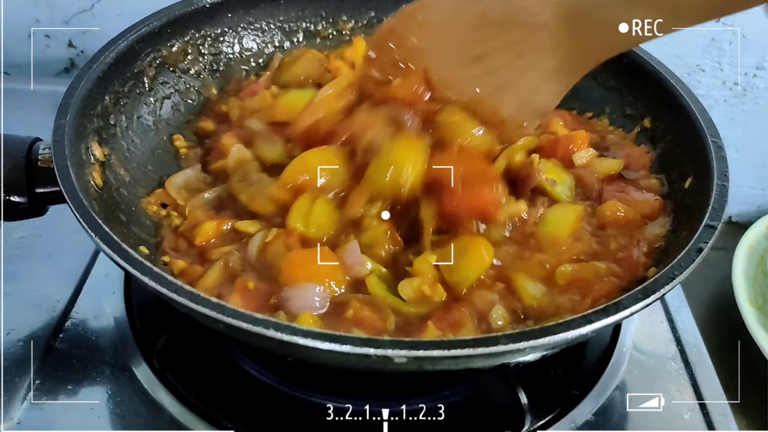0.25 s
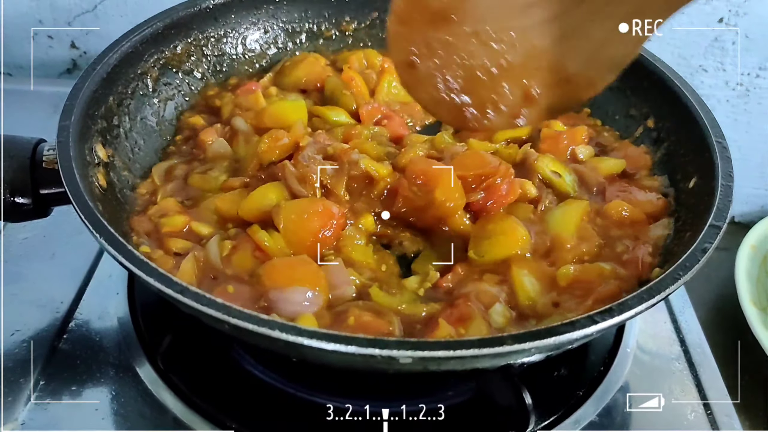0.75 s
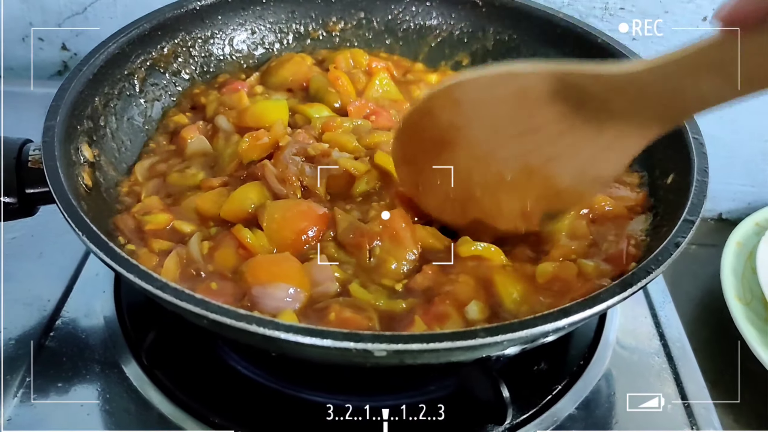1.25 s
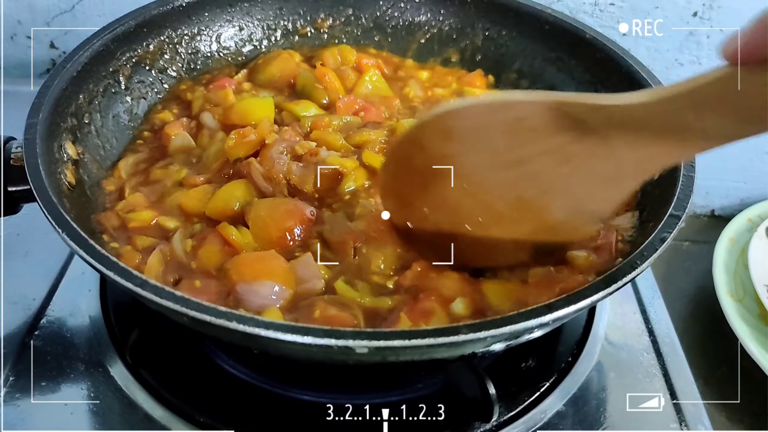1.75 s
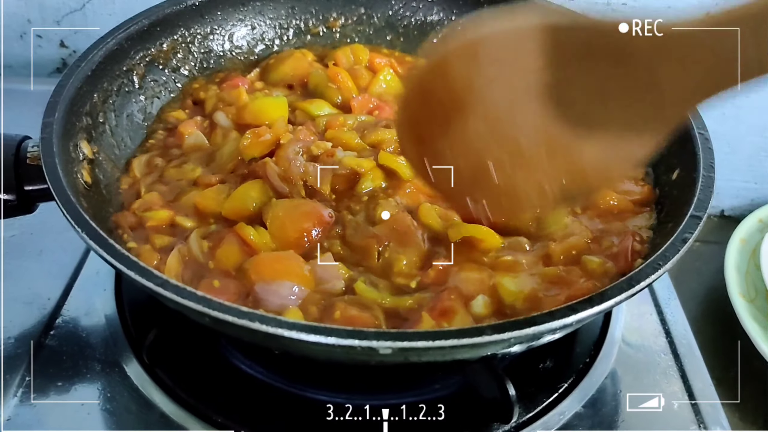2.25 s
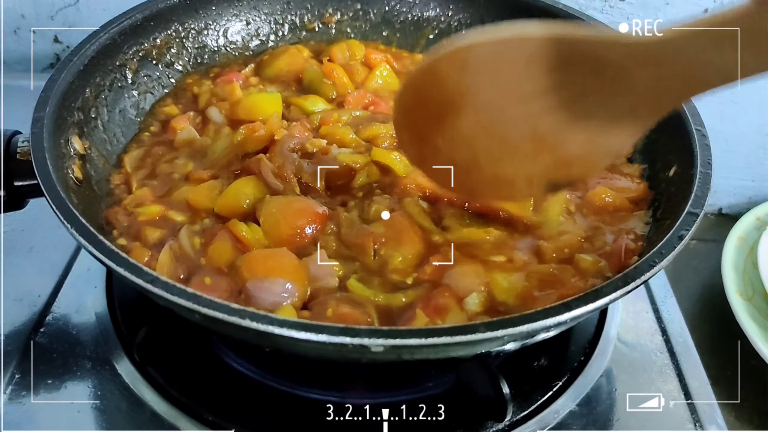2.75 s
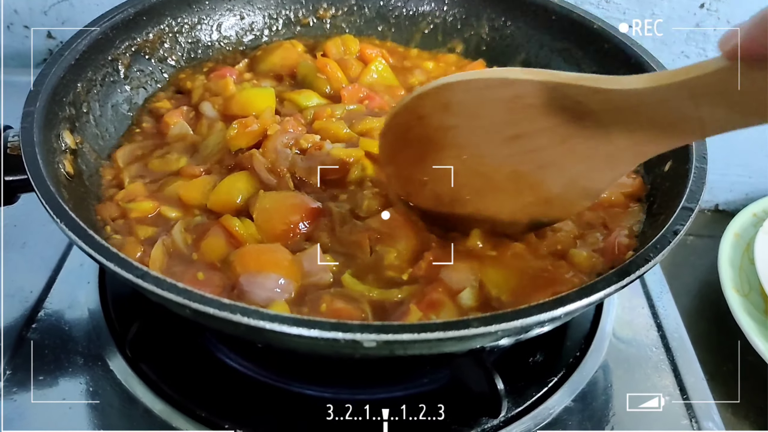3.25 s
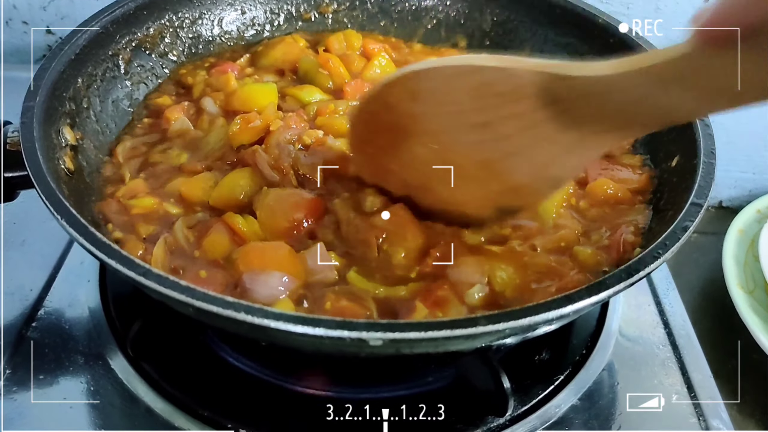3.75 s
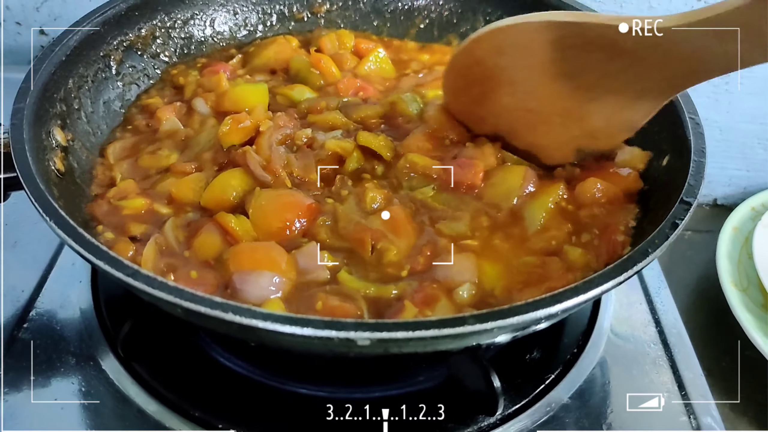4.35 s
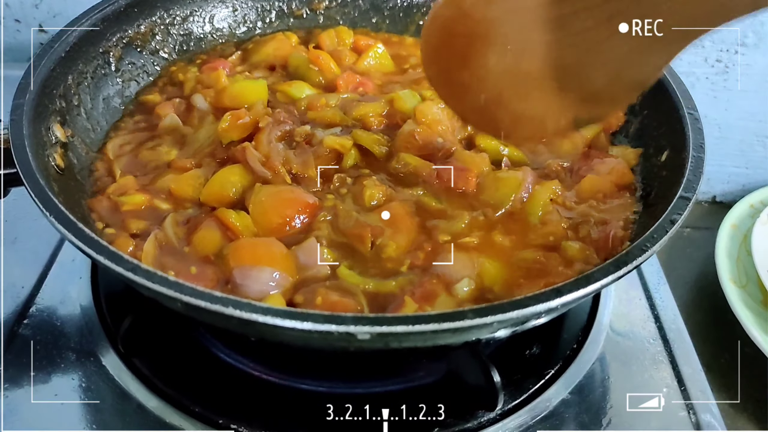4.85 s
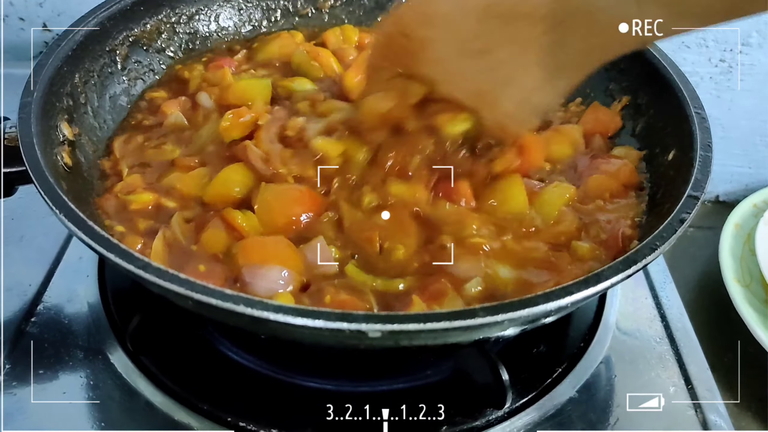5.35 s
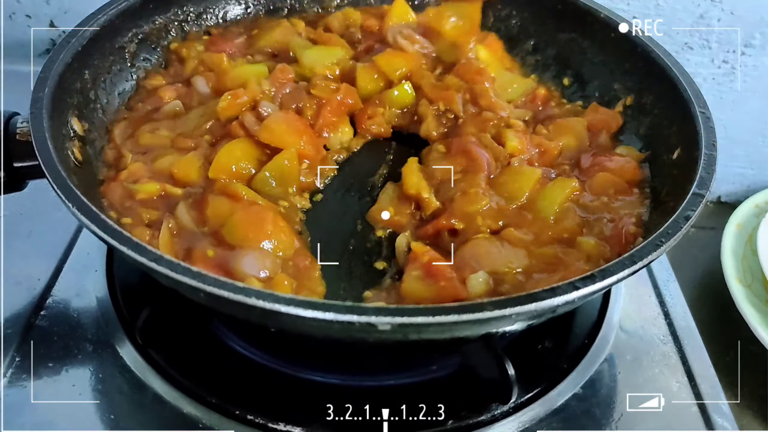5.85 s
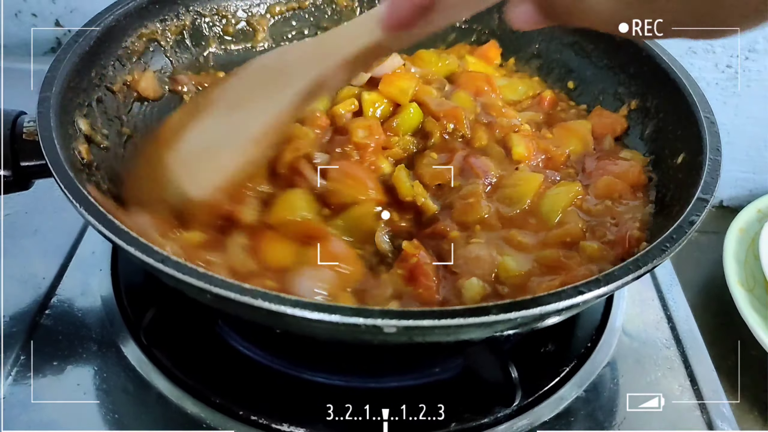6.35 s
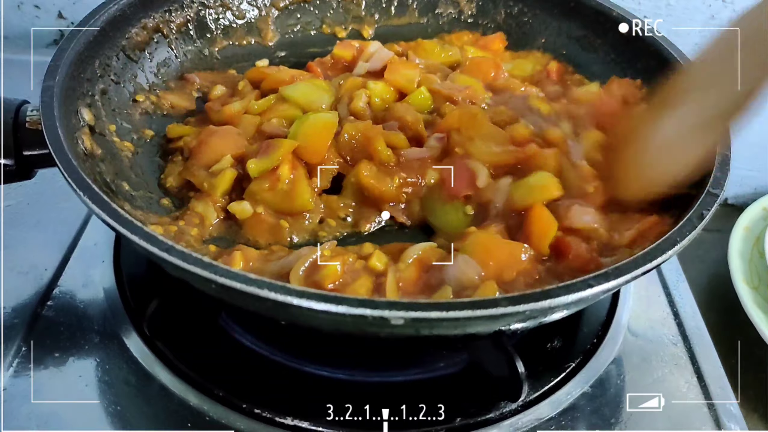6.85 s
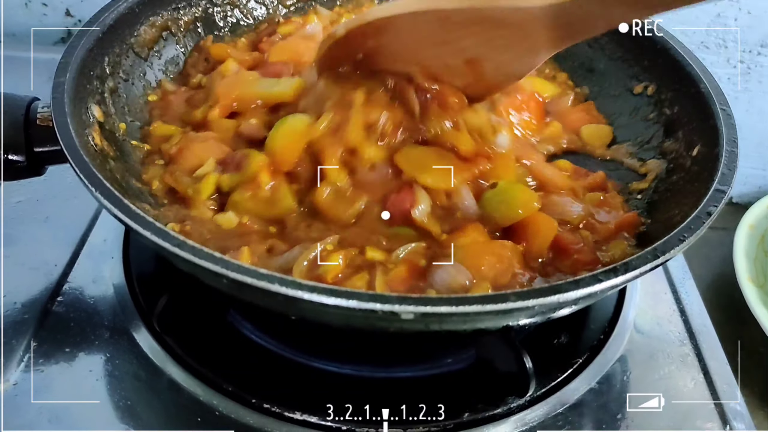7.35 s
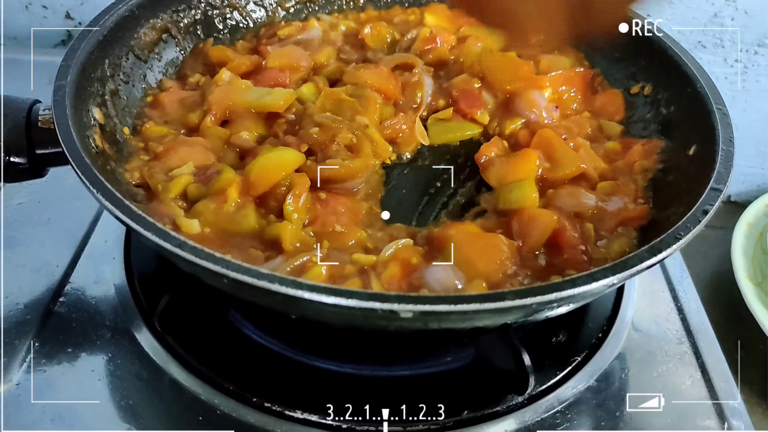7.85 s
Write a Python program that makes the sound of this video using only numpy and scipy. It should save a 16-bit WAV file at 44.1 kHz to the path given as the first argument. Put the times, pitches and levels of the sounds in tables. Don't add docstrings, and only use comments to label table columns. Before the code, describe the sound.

A wooden spoon chops through simmering sauce and hits the pan floor: evenly spaced woody, briefly ringing knocks at first, the strongest early on. Then about a second and a half of only bubbling, sizzle and spits. More knocks follow, softer and uneven, mixed with short gritty drags. Near stereo microphones in a small home kitchen, little bass, brighter on the right, brief room reflections.

```python
import sys
import numpy as np
from scipy import signal
from scipy.fft import rfft, irfft, next_fast_len
from scipy.io import wavfile
from scipy.ndimage import uniform_filter1d

SR = 44100
rng = np.random.default_rng(int(sys.argv[2]) if len(sys.argv) > 2 else 0)


def generate_wav(signal):
    frames = np.transpose(np.atleast_2d(signal))
    scaled = np.clip(frames, -1, 1) * 32767
    pcm = np.round(scaled).astype(np.int16)
    wavfile.write(sys.argv[1], SR, pcm)


def boost(x):
    u = np.asarray(x, float) / 20
    return 10 ** u


N = 357651
T = np.arange(N) / SR
PADDED = next_fast_len(N + SR // 10)
HZ = np.maximum(np.fft.rfftfreq(PADDED, 1 / SR), 1)

# f/Hz, level/dB, t60/s, left over right/dB
PAN = [(306.6, -17, 0.2, 5), (338, -14, 0.36, 1), (380.5, -0.5, 0.2, -2), (412.3, -12.5, 0.17, 12),
       (480.3, -3, 0.2, -4), (543, -8, 0.24, 0.5), (608, -21, 0.18, -16), (659.5, 3.5, 0.047, -2.5),
       (712.4, -11, 0.18, 9), (757, -0.5, 0.067, 10), (873, -9, 0.05, -11), (903.5, -7.5, 0.066, -12),
       (975, -3.5, 0.075, -5), (1055, -7.5, 0.09, -1), (1148, -14, 0.11, -6.5), (1272, -14, 0.043, -8),
       (1400, -13.5, 0.13, 5.5), (1520, -17, 0.097, -9), (1596, -26.5, 0.18, 5), (1712, -16, 0.068, -18),
       (1998, -21.5, 0.087, -4), (2215, -16.5, 0.1, 10.5), (2370, -35, 0.06, -9), (2683, -17, .06, -8),
       (3020, -30.5, 0.065, -25), (3380, -41, 0.055, -1)]


def rms_one(x):
    return x / np.sqrt(np.mean(x ** 2) + 1e-20)


def columns(rows, at, scale=np.asarray):
    first, *rest = np.transpose(rows)
    return np.array([np.interp(scale(at), scale(first), column) for column in rest])


def bandpass(order, band_hz):
    return signal.butter(order, band_hz, "band", fs=SR, output="sos")


def drift(rate_hz):
    r = np.exp(-80 * np.pi * rate_hz / SR)
    noise = rng.standard_normal(N // 40 + 2002)
    slow = signal.lfilter([1], [1, -2 * r, r * r], noise)[2000:]
    return np.interp(np.arange(N) / 40, np.arange(len(slow)), rms_one(slow))


def ring(x, hz, t60):
    r, w = boost(-60 / (t60 * SR)), 2 * np.pi * hz / SR
    return signal.lfilter([0, np.sin(w)], [1, -2 * r * np.cos(w), r * r], x + 1e-18)


def grains(per_s, spread_db, size=N):
    chance, pick = rng.random((2, 3, size))
    sizes = boost(spread_db * np.minimum(-np.log(1 - chance), 5))
    sign = np.sign(pick - per_s / SR / 2)
    return rms_one(sizes * sign * (pick < per_s / SR))


def at_ports(streams):
    # f/Hz, shared power/0..1
    likeness = [(250, 1), (500, 1), (1000, 0.4), (2000, 0.26), (4000, 0.041), (8000, 0.19)]
    left_lag_s = 0.00024
    alike = np.clip(columns(likeness, HZ, np.log)[0], 0, 1)
    shared, left, right = rfft(streams, PADDED)
    late = np.exp(-2j * np.pi * HZ * left_lag_s)
    common = np.sqrt(alike) * shared * [late, late ** 0]
    apart = np.sqrt(1 - alike) * np.array([left, right])
    return irfft(common + apart, PADDED)[:, :N]


def knocks():
    # t/s, peak/dB, deep share/dB, upper share/dB, treble share/dB
    blows = [(0.602, -19.5, -15.5, -5.5, -22), (0.946, -10, -18.5, -14, -20), (1.259, -12, -20, -16, -23.5),
             (1.564, -8, -21, -13, -22.5), (1.846, -17.5, -22.5, -18, -25),
             (2.142, -23.5, -15.5, -21.5, -31), (3.613, -40, -7.5, -4, -22), (4.142, -17, -19, -43, -34),
             (4.4582, -16, -15.5, -12.5, -16), (4.766, -19.5, -16.5, -11, -19.5),
             (4.959, -41, -31, -7, -22), (5.039, -16.5, -17.5, -11, -19), (5.3276, -26, -16.5, -17, -10),
             (6.073, -21.5, -23, -26, -13), (6.927, -28, -18, -10, -19), (6.987, -35.5, -4.5, -13, -4),
             (7.385, -19.5, -18.5, -32, -32), (7.691, -48.5, 0.5, -3, -19), (8.018, -24, -7.5, -8, -38)]
    spoon_lag_s = 0.00016
    uneven_db = 1.6
    low_hard_db, low_most_db, gentle_peak_db, low_gain = -21.5, -10.5, -16.5, 0.96
    free_s, landing_s, landing_db = 0.018, 0.0022, -5.5

    out, t = np.zeros((2, N + SR)), np.arange(SR // 4) / SR
    hz, mode_db, t60, side_db = np.transpose(PAN)[:, :, None]
    settling = boost(landing_db / (1 + np.exp(-(t - free_s) / landing_s)))
    dull, dry_wood = bandpass(4, [330, 1150]), bandpass(1, [1400, 2800])
    tick = signal.sosfilt(bandpass(2, [700, 3800]), 1. * (t == 0))
    flip = np.pi * np.arange(len(PAN))[:, None]

    for s, peak_db, deep_db, upper_db, treble_db in blows:
        strength, turn, skew = rng.standard_normal((3, len(PAN), 1))
        wood = rng.standard_normal((3, len(t)))
        slosh = np.cumsum(rng.standard_normal((len(PAN), len(t) // 64 + 1)), axis=1)
        slosh = uniform_filter1d(np.repeat(slosh, 64, axis=1), size=64, axis=1)
        wander = slosh[:, :len(t)] * hz / 900

        contact_s = 0.0009 * boost(-0.3 * (treble_db + 18))
        settle = settling * (1 - np.exp(-t / contact_s))
        low_db = np.clip(low_hard_db + low_gain * (gentle_peak_db - peak_db), low_hard_db, low_most_db)
        shares_db = [deep_db + 15.5, low_db + 10.5, low_db + 19.0, 0, 0,
                     upper_db + 13, (upper_db + treble_db) / 2 + 20, treble_db + 21.5]
        colour_db = np.interp(hz, [415, 417, 600, 640, 790, 890, 1450, 1730], shares_db)
        mode_peak_db = peak_db - 9.5 + mode_db + colour_db + uneven_db * strength
        height = boost(mode_peak_db - 60 * t / t60) * settle

        thud = boost(peak_db - 0.5 - 60 * t / 0.24) * settle * signal.sosfilt(dull, wood[2])
        rattle = boost(peak_db + treble_db + 11 - 60 * t / 0.15) * settle * signal.sosfilt(dry_wood, wood[:2])
        crack = boost(peak_db + 0.5 * treble_db - 39.0 - 60 * t / 0.013) * wood[1::-1]
        touch = boost(peak_db + treble_db + 29) * tick
        for ear, sign in enumerate([0.5, -0.5]):
            phase = 2 * np.pi * hz * t + flip + 0.22 * wander + 0.5 * turn + sign * skew * hz / 1600
            modes = np.sum(height * boost(sign * side_db) * np.sin(phase), axis=0)
            at = round((s - 0.0009 + spoon_lag_s * (1 - ear)) * SR)
            out[ear, at:at + len(t)] += touch + thud + rattle[ear] + crack[ear] + modes
    return out[:, :N]


def scuffs():
    # t/s, length/s, level/dB, brightness f/Hz
    strokes = [
        (0.21, 0.082, -51, 1490),
        (2.645, 0.03, -45.5, 1200),
        (5.334, 0.04, -44, 3500),
        (5.545, 0.49, -56.5, 2500),
        (6.095, 0.15, -52, 2500),
        (6.355, 0.3, -53, 1490),
        (6.923, 0.076, -38, 1230),
        (6.986, 0.064, -39, 2280),
        (7.683, 0.18, -54, 1180),
        (7.93, 0.035, -58, 3500),
    ]
    out = np.zeros((3, N))
    for s, length_s, level_db, bright_hz in strokes:
        a, n = round(s * SR), round(length_s * SR)
        swell = np.sin(np.pi * np.sqrt(np.arange(n) / n))
        slips = grains(2500, spread_db=2.0, size=SR // 2)[:, :n]
        dull = signal.sosfilt(signal.butter(2, bright_hz, fs=SR, output="sos"), slips)
        out[:, a:a + n] += boost(level_db) * swell * rms_one(dull)
    return at_ports(out)


def bubbling(level_db):
    thuds = at_ports(grains(900, spread_db=3.5) * boost(2.0 * drift(6.2)))
    swells = [boost(1.5 * drift(14)) for group in range(4)]
    out = 0
    for k, (hz, mode_db, t60, side_db) in enumerate(PAN[:18]):
        gain = boost(0.8 * mode_db + np.array([[0.6], [-0.6]]) * side_db) / np.sqrt(t60)
        out = out + gain * swells[k % 4] * ring(thuds, hz, 2.85 * t60)
    return boost(level_db) * rms_one(out)


def sizzle(sizzle_db, fizz_db):
    # f/Hz, level per Hz/dB
    colour = [(200, 15), (400, -6), (1000, -0.5), (1500, -5.5), (2500, -1), (4000, -3), (8000, -6),
              (16000, -4)]
    streams = grains(9000, spread_db=3.5) + 1.037 * rng.standard_normal((3, N))
    out, together = 0, drift(25)
    edges = 283 * 2 ** np.arange(0, 6.1, 0.5)
    for k, (low, high) in enumerate(zip(edges, edges[1:])):
        band = signal.sosfilt(bandpass(2, [low, high]), streams)
        level_db = sizzle_db + 7.0 if high < 5000 else fizz_db + 8
        colour_db = columns(colour, np.sqrt(low * high), np.log)[0]
        flicker_db = 0.7 * together + 1.3 * drift(27)
        out = out + (-1) ** k * band * boost(level_db + colour_db + flicker_db)
    return at_ports(out)


def spits():
    # t/s, peak/dB, top share/dB
    large_drops = [(0.5841, -26, -18), (0.7612, -34, -45), (0.949, -22.5, -39), (1.4446, -30, -25),
                   (2.0542, -30, -25), (2.1874, -32, -30), (2.242, -28, -26), (2.366, -32, 4),
                   (2.4698, -29, -23), (2.4897, -29, -32), (2.64, -30.5, 0.5), (2.7207, -27, -9),
                   (2.7768, -26.5, 0.5), (3.637, -27.5, -21), (3.7606, -29, -24), (3.7923, -29, -38),
                   (4.1302, -27, -25), (4.2078, -35, -5), (4.2636, -29, -58), (4.338, -28.5, -46),
                   (4.7432, -28, -8), (5.2345, -30.5, -26), (5.449, -32, -1), (5.6854, -34, 1),
                   (5.6994, -32, -8), (5.9943, -34, -21), (6.703, -28.5, -34), (6.9556, -28, -13),
                   (7.3717, -26, -23), (7.7373, -30, -6)]
    droplet_count, mean_top_db = 40, -21
    peaks_db = rng.normal(-35.5, 3, droplet_count)
    tops_db = rng.normal(mean_top_db, 4, droplet_count)
    droplets = list(zip(rng.random(droplet_count) * N / SR, peaks_db, tops_db))

    out, t = np.zeros((2, N + SR)), np.arange(SR // 20) / SR
    body, middle, top = bandpass(2, [1200, 4500]), bandpass(2, [5500, 10500]), bandpass(2, [9500, 14000])
    fizz = boost(-27 - 60 * t / 0.0029) + boost(-20.5 - 60 * t / 0.05)
    for s, peak_db, top_db in large_drops + droplets:
        burst = rng.standard_normal((2, len(t))) * fizz + (t == 0)
        body_db = -10 - 0.8 * max(top_db - mean_top_db, 0)
        drop = boost(body_db) * signal.sosfilt(body, burst) + signal.sosfilt(middle, burst)
        drop += boost(top_db + 10) * signal.sosfilt(top, burst)
        at = round(s * SR)
        out[:, at:at + len(t)] += boost(peak_db + 14.5) * drop
    return out[:, :N]


def kitchen(x):
    t60 = 0.26
    t = T[:SR // 3]
    tail = rng.standard_normal((3, len(t))) * boost(-60 * t / t60) * (t > 0.004)
    tail = at_ports(tail)[:, :len(t)]
    tail = tail / np.sqrt(np.sum(tail[0] ** 2))
    return signal.oaconvolve(x[1:], tail, axes=1)[:, :N]


def scene():
    # t/s, vigour of the sauce/dB, hot floor laid bare/dB
    simmer = [(0.0, -4, 1), (0.27, -5, 2), (0.6, -3, -1.5), (0.95, -4, 1), (1.2, 1.5, 0.5), (1.74, 0, -0.5),
              (2.0, 0.5, 0), (2.9, 0.5, 0), (4.04, 2.5, 2), (4.5, -0.5, 0.5), (5.06, 2, 1.5), (5.56, 1, 1),
              (5.72, -4.5, 3), (6.1, -2.5, 2), (6.4, 3.5, 1.5), (6.71, 2, 0.5), (7.2, -4, 0),
              (8.11, -2.5, 1)]
    vigour_db, bare_db = columns(simmer, T)
    hits = knocks() + scuffs() + spits()
    sauce = bubbling(-54.5 + vigour_db)
    fat = sizzle(-53 + 0.25 * bare_db, -51 + bare_db)
    return hits + boost(-10.0) * kitchen(hits) + sauce + fat


def low_pass(x):
    return signal.sosfilt(signal.butter(12, 16460, fs=SR, output="sos"), x)


def record(dry):
    # f/Hz, left/dB, right/dB
    ports = [(2024, 2, 2.5), (3500, -3, -2.5), (4800, -12, -14), (5300, -25, -10.5), (6030, -20.5, -12.5),
             (6920, -31, -1), (7590, -14, 5.5), (8000, -14.5, 3), (9280, -14.5, -3.5), (11000, -19.5, -8.5),
             (13800, -30, -13.5), (14900, -25.5, -8), (15500, -25.5, -9.5)]
    bass_cut_hz, top_cut_hz = 231.1, 15750
    cepstrum = irfft(np.log(boost(columns(ports, HZ, np.log))), PADDED)
    cepstrum[:, 1:PADDED // 2] *= 2
    cepstrum[:, PADDED // 2:] = 0
    colour = np.exp(rfft(cepstrum))
    heard = irfft(rfft(dry, PADDED) * colour * (HZ < top_cut_hz), PADDED)[:, :N]
    cut = signal.sosfilt(signal.cheby2(10, 48, bass_cut_hz, "high", fs=SR, output="sos"), heard)
    leak = boost(-35.5) * heard.mean(axis=0)
    return low_pass(cut + leak)


dry = scene()
out = record(dry)
generate_wav(out)
```